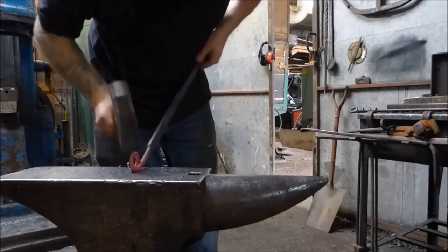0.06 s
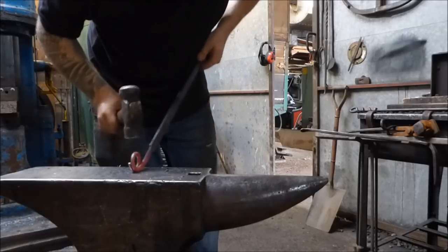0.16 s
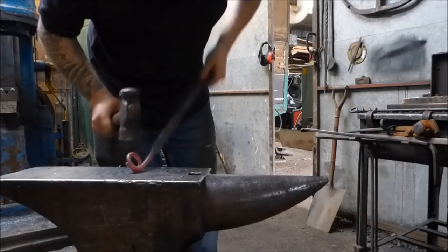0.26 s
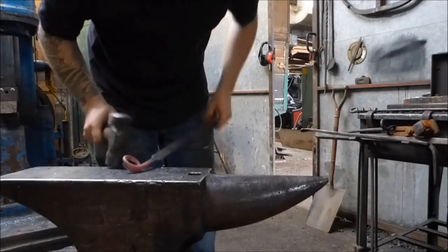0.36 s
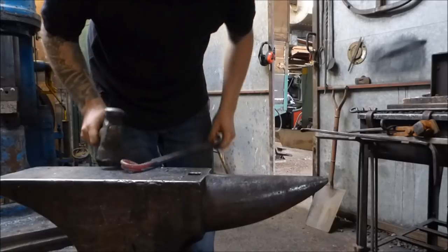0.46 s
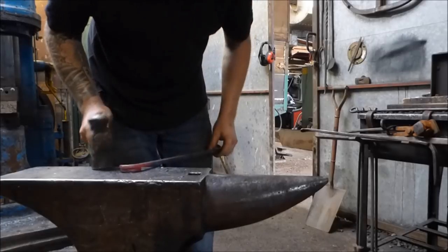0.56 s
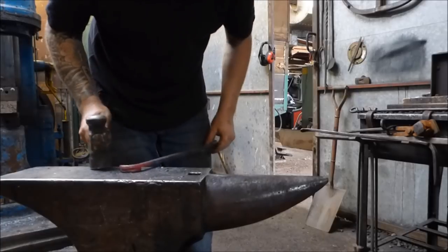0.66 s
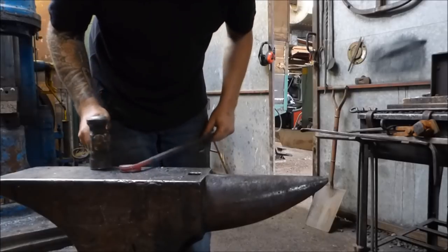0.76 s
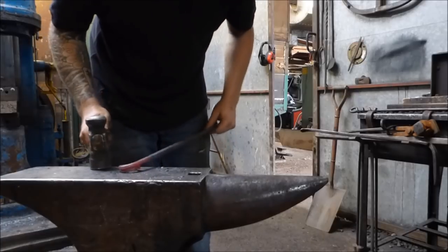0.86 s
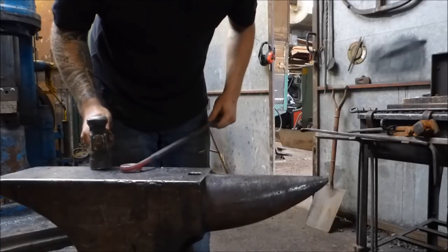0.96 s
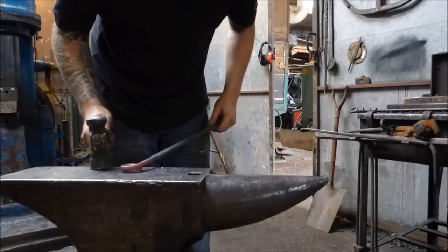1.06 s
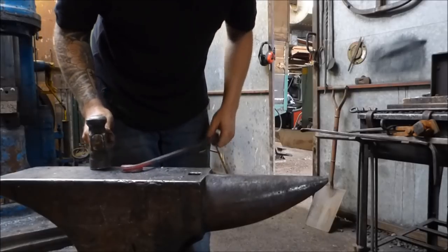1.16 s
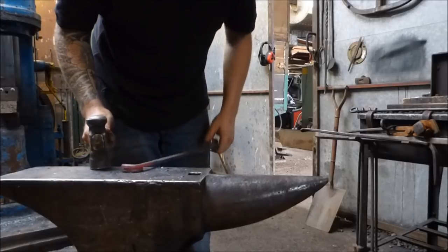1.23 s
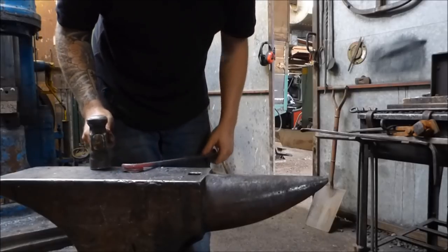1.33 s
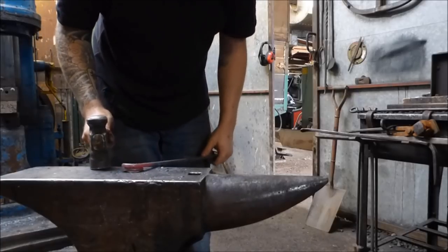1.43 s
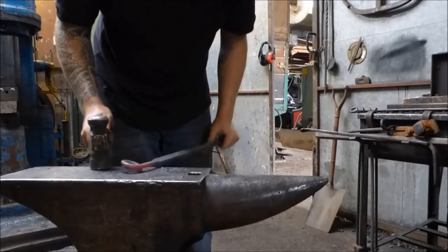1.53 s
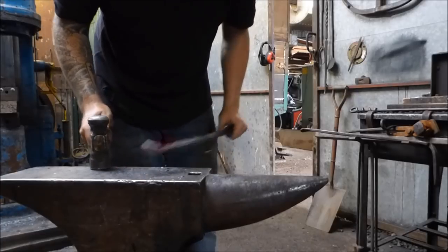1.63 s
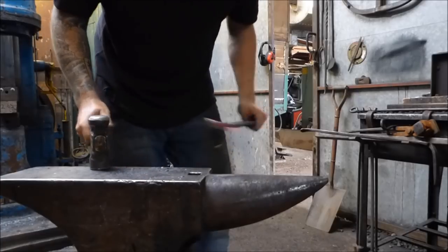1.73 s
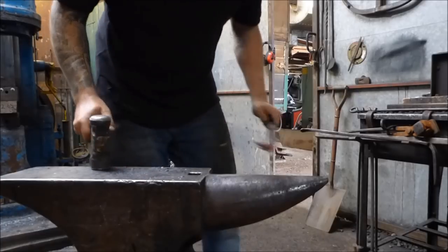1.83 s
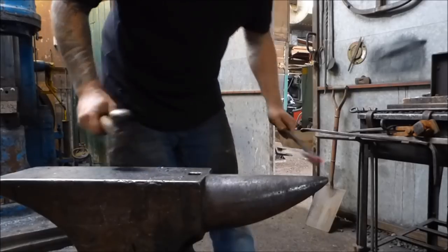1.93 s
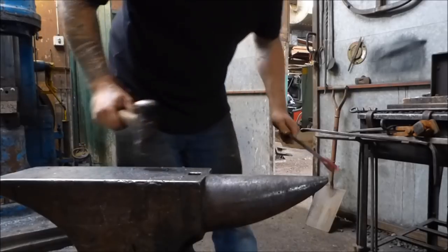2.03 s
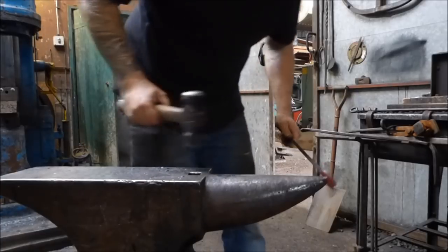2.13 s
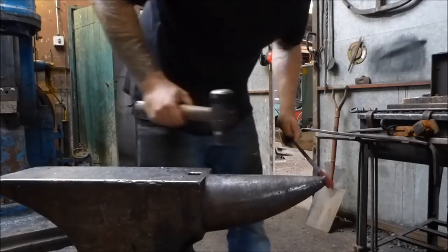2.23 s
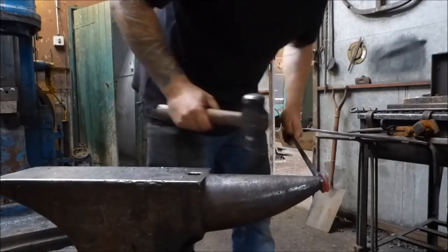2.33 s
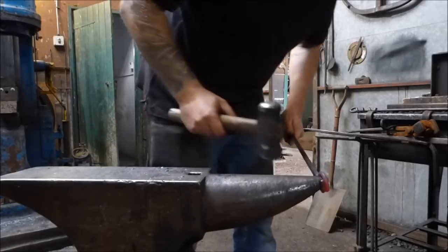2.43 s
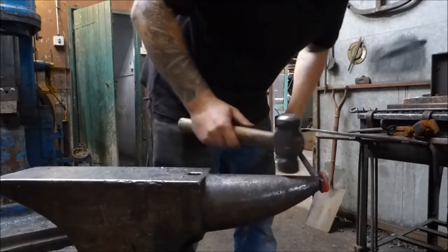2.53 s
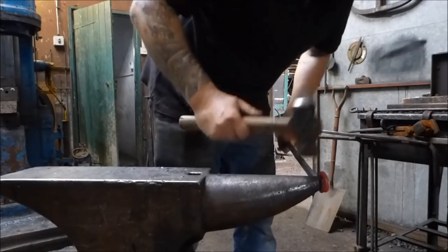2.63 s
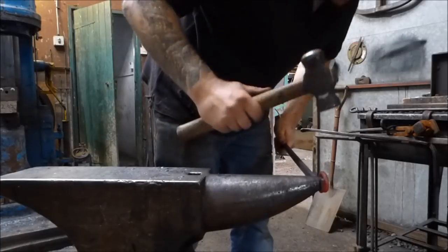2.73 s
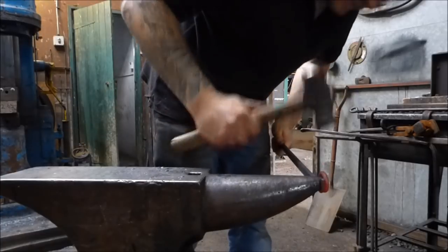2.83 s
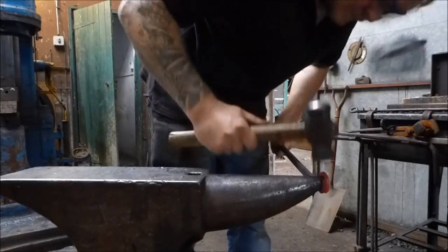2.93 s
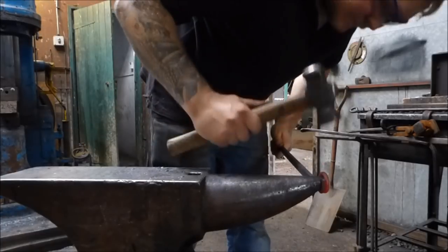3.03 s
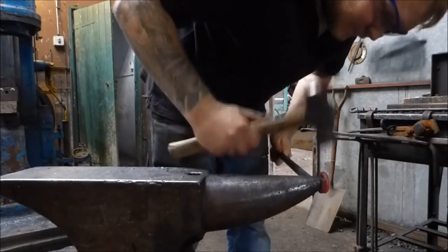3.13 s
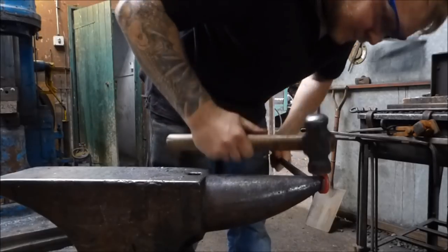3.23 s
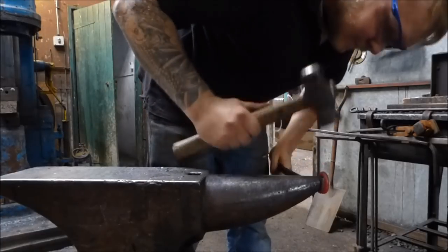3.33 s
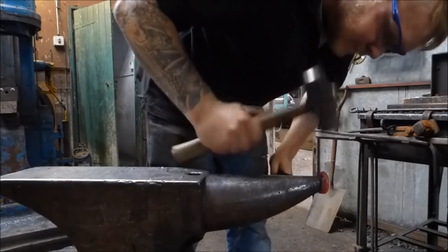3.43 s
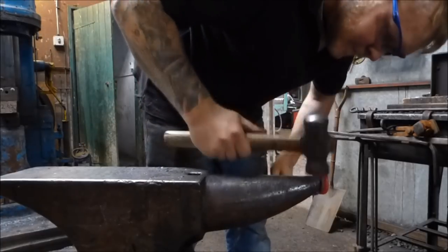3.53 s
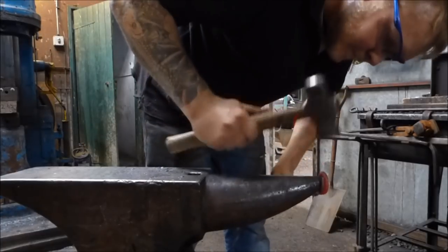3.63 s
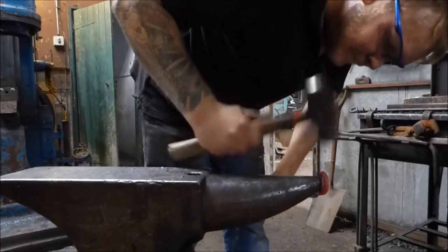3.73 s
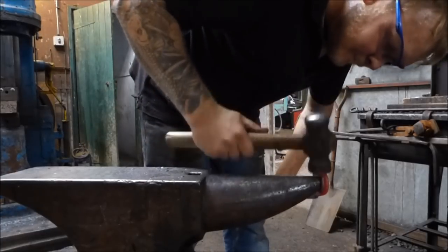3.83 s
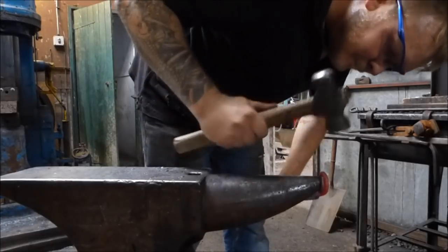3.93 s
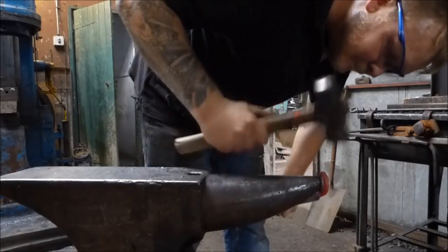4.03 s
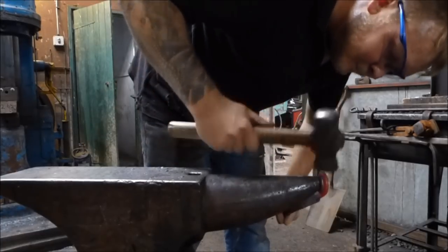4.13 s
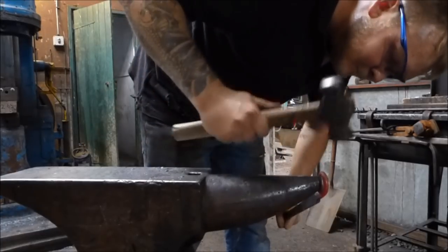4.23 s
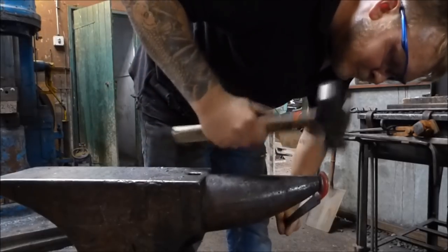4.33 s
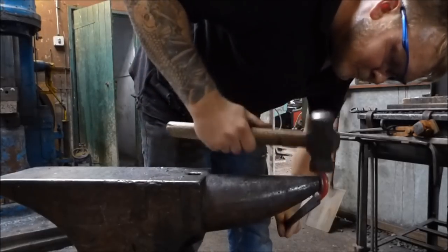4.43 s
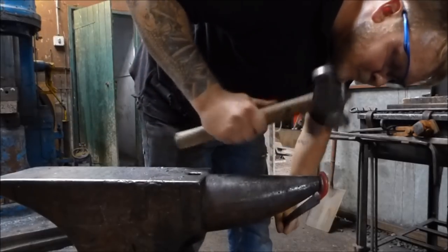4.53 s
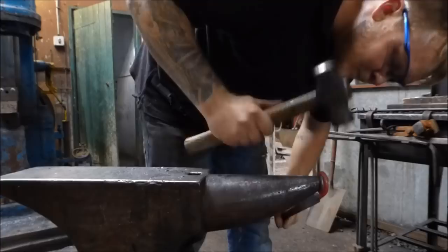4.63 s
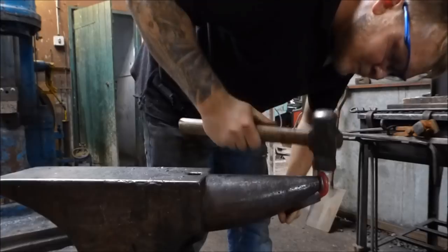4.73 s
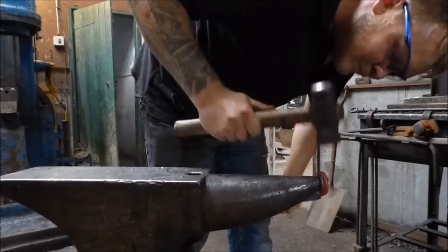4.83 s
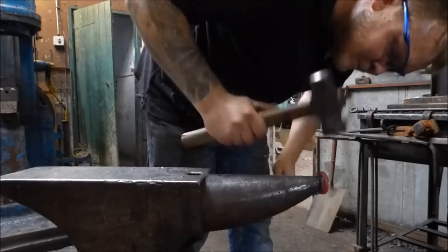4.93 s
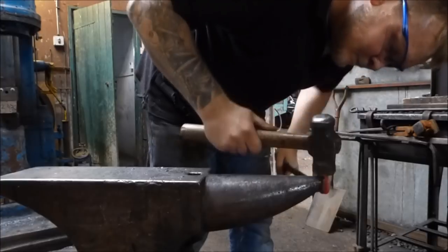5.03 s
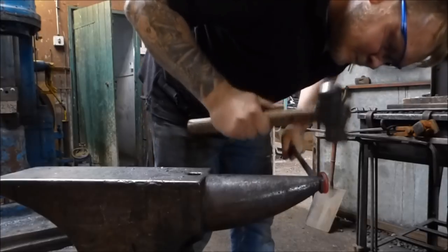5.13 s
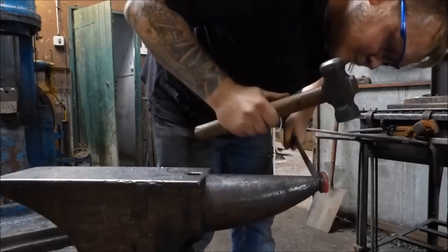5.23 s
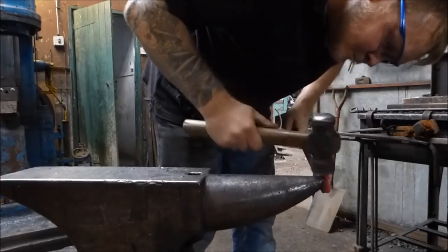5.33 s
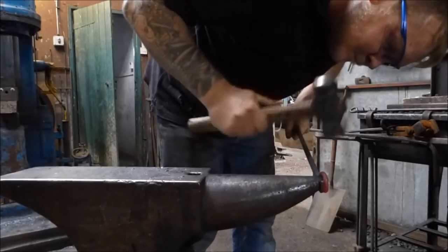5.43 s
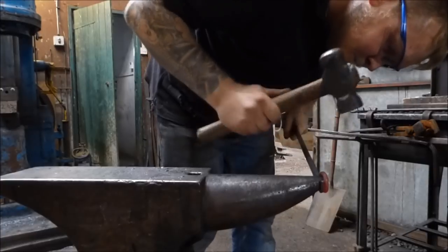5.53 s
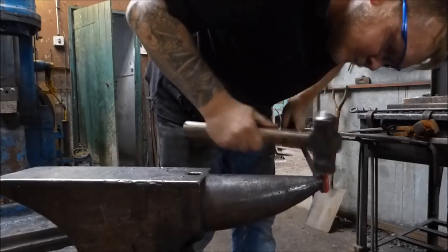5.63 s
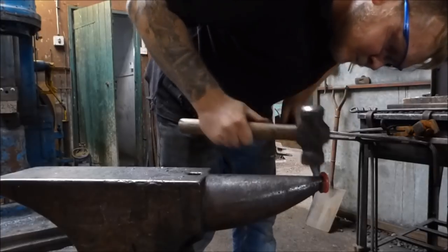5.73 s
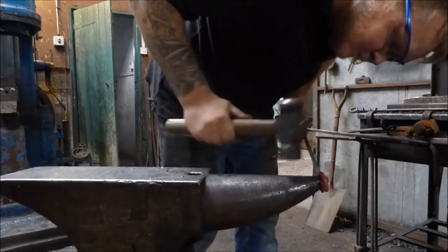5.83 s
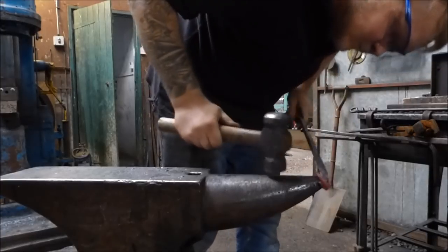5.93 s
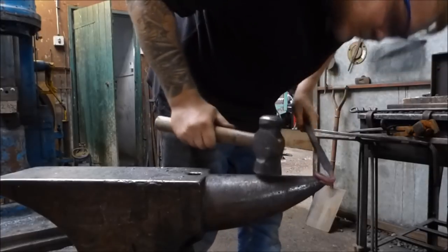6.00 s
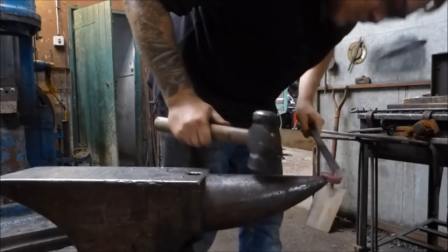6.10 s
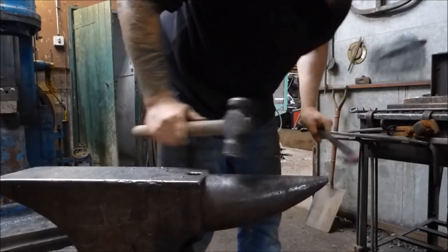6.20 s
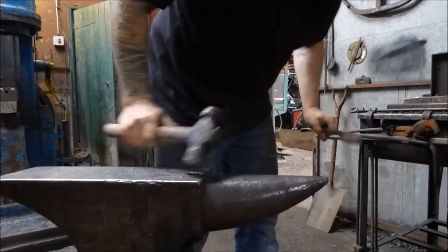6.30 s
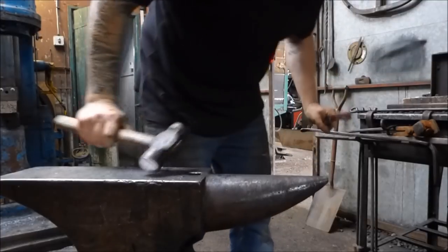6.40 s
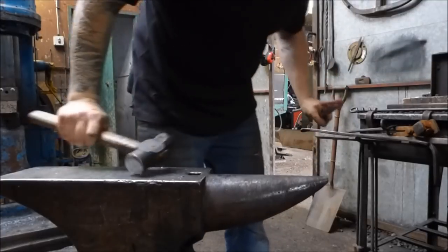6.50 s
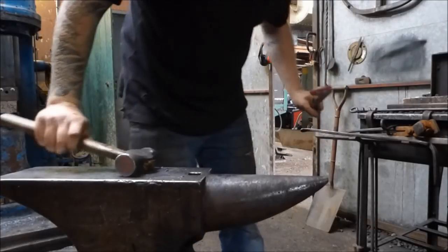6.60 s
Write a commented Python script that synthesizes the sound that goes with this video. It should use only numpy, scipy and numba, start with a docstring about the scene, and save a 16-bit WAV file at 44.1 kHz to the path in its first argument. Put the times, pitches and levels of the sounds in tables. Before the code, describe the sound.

A hammer strikes steel on an anvil, bounces, pauses, then beats out quick, steady ringing blows in a hard-walled forge.

```python
"""Hammer and anvil in a forge

A hand hammer works a hot steel rod between hard walls, close to a microphone with gain control.
It strikes on the anvil's face, drops and bounces there, works the rod over the horn, and bounces
on the face again. In the pause the rod clinks faintly and soft treble swishes pass over a low rustle."""
import sys
import numpy as np
from scipy import signal
from scipy.fft import rfft, irfft, next_fast_len
from scipy.io import wavfile
from scipy.ndimage import uniform_filter1d
from numba import njit

SR = 44100
rng = np.random.default_rng(int(sys.argv[2]) if len(sys.argv) > 2 else 0)


def wav_record(signal):
    """Record a signal, one row per channel, as 16-bit PCM in the file named by sys.argv[1]."""
    frames = np.transpose(np.atleast_2d(signal))
    bounded = np.clip(frames, -1, 1)
    # unit amplitude maps onto the largest positive 16-bit level
    quanta = np.round(bounded * 32767).astype(np.int16)
    wavfile.write(sys.argv[1], SR, quanta)


N = 293706


def amp(db):
    return 10 ** (np.asarray(db) / 20)


def unit(x):
    return x / np.sqrt(np.mean(x ** 2) + 1e-20)


def along(points, hz):
    """Reads (freq_hz, value) points on a log frequency axis."""
    freqs, values = np.transpose(points)
    return np.interp(np.log(hz + 1), np.log(freqs + 1), values)


def filtered(x, gain):
    """x times a gain that depends on frequency."""
    size = next_fast_len(x.shape[-1] + 8192)
    return irfft(rfft(x, size) * gain(np.fft.rfftfreq(size, 1 / SR)), size)[..., :x.shape[-1]]


# The forge's stereo width at the microphone: freq_hz, side_over_mid_db
ROOM_WIDTH = [(60, -3), (110, -18), (200, -27.5), (380, -21.5), (700, -12), (1290, -6.5), (2380, -9),
              (4400, -7.5), (8120, -7), (15000, -1.5)]
def widen(pair, extra_db):
    """Two unrelated signals become mid and side of a left-right pair."""
    side = filtered(pair[1], lambda hz: amp(along(ROOM_WIDTH, hz) + extra_db))
    return np.array([pair[0] + side, pair[0] - side])


# Reverberation between the hard walls: freq_hz, t60_s
WALL_DECAY = [(100, 0.46), (260, 0.74), (700, 0.68), (2000, 0.81), (5000, 0.68), (12000, 0.42)]
def room(x):
    """A fresh diffuse tail builds up quickly, each frequency dying at its own speed."""
    hz, t, noise = signal.stft(rng.standard_normal((2, SR)), SR, nperseg=256)
    decay = amp(-60 * t / along(WALL_DECAY, hz)[:, None])
    tail = signal.istft(noise * decay, SR, nperseg=256)[1][:, :SR]
    tail *= 1 - np.exp(-(np.arange(SR) / SR / 0.00077) ** 2)
    return signal.fftconvolve(x[None], widen(tail / np.linalg.norm(tail[0]), extra_db=-1.5), axes=1)


def place(start_s, near, diffuse):
    """One hit on a stereo track: direct sound just left of centre, plus the walls' answer."""
    hit = room(diffuse)
    hit[:, :len(near)] += near * amp([[.3], [-.3]])
    track = np.zeros((2, N + 3 * SR))
    start = round((start_s + 1) * SR)  # a second of lead-in allows negative start times
    track[:, start:start + hit.shape[1]] += hit
    return track[:, SR:SR + N]


def hiss(spectrum, patchy_db, wide_db):
    """Coloured stereo noise with patches of random gain."""
    noise = signal.stft(rng.standard_normal((2, N)), nperseg=512)[2]
    patches = uniform_filter1d(rng.standard_normal(noise.shape[1:]), size=5, axis=0)
    patches = uniform_filter1d(patches, size=8, axis=1)
    pair = signal.istft(noise * amp(patchy_db * unit(patches)), nperseg=512)[1][:, :N]
    return widen(unit(filtered(pair, lambda hz: amp(along(spectrum, hz)))), wide_db)


# Colour of the rustle all around the microphone: freq_hz, density_db
RUSTLE_SPECTRUM = [(15, -82), (25, -29), (104, -10.5), (218, -6), (259, -3), (332, -3.5), (394, -7),
                   (934, -14), (1110, -16.5), (1420, -18), (9000, -29), (11700, -64), (19800, -120)]
# Its rise and fall: time_s, level_db
RUSTLE_LEVELS = [(1.1, -60.5), (1.5, -58), (1.76, -54), (2.0, -60), (2.07, -55), (2.18, -58), (2.25, -55)]
def rustle():
    """The room's low, wide noise wavers in the pause."""
    level_db = np.interp(np.arange(N) / SR, *np.transpose(RUSTLE_LEVELS))
    return amp(level_db) * hiss(RUSTLE_SPECTRUM, patchy_db=1.5, wide_db=9)


# Colour of the high hiss in the room: freq_hz, density_db
SWISH_SPECTRUM = [(2940, -44), (5000, -10), (5520, 10), (6430, -36), (9430, 12), (12400, 12), (15500, -11)]
# Its swells: start_s, level_db
SWISHES = [(1.369, -57), (1.55, -59), (1.71, -55), (2.04, -55), (2.17, -59)]
def swishes(rise_s=0.031, t60_s=0.31):
    """Treble swishes swell and fade over a faint steady hiss."""
    level = amp(-73.5)
    for start_s, db in SWISHES:
        age = np.maximum(np.arange(N) / SR - start_s, 0)
        level = level + amp(db - 60 * age / t60_s) * (1 - np.exp(-age / rise_s))
    return level * hiss(SWISH_SPECTRUM, patchy_db=1, wide_db=-2)


def ringing(modes, onset_s, scatter_db=2):
    """Damped sines; each blow lands elsewhere and wakes the modes at new strengths."""
    t = np.arange(SR // 2) / SR
    hz, db, t60 = np.transpose(modes)[:, :, None]
    db = db + scatter_db * rng.standard_normal(hz.shape)
    phase = 2 * np.pi * (hz * t + rng.random(hz.shape))
    return (amp(db - 60 * t / t60) * np.sin(phase)).sum(0) * (1 - np.exp(-t / onset_s))


# Modes of the loosely held rod: pitch_hz, level_db, t60_s
LOOSE_ROD_MODES = [(3300, -6, .1), (4880, -3, .12), (5750, -8, .1), (6700, -8, .12), (7650, -8, .1),
                   (8470, -5, .1), (9370, 0, .12), (10250, -3, .1), (11530, 0, .2), (12760, -3, .12)]
# Faint clinks in the pause: start_s, relative_db
ROD_CLINKS = [(0.9994, -50), (1.291, -52.5), (1.5344, -51.5), (1.57, -53)]
def rod_clinks():
    """The rod touches steel and rings thinly."""
    out = np.zeros((2, N))
    for start_s, db in ROD_CLINKS:
        clink = amp(db - 10) * ringing(LOOSE_ROD_MODES, onset_s=0.0025)
        out += place(start_s, clink, amp(1) * clink)
    return out


# Colour of a contact, heard close: freq_hz, density_db
CRACK_SPECTRUM = [(88, -65), (150, 0.5), (695, 4.5), (1450, -4.5), (1940, 1), (2550, -14.5), (4140, -6.5),
                  (7270, -12), (10700, -9), (13000, -15.5), (15500, -46)]
# Its body, middle and treble bands, each: freq_hz, share
CRACK_BANDS = [
    [(1800, 1), (3000, 0)],
    [(1800, 0), (3000, 1), (4800, 1), (6500, 0)],
    [(4800, 0), (6500, 1)],
]
def crack(body_db, treble_db, middle_db=-3, push_over_body_db=8.5, push_s=0.00149):
    """An impact gives a short noise burst in three bands around one low push."""
    t = np.arange(SR // 10) / SR
    noise = filtered(rng.standard_normal(len(t)), lambda hz: amp(along(CRACK_SPECTRUM, hz)))
    burst = sum(amp(db) * unit(filtered(noise, lambda hz: along(band, hz)))
                for band, db in zip(CRACK_BANDS, (body_db, middle_db, treble_db)))
    envelope = (1 - np.exp(-t / 0.0022)) * amp(-60 * t / 0.028)
    impulse = signal.unit_impulse(len(t), round(push_s * SR))
    push = filtered(impulse, lambda hz: amp(along(CRACK_SPECTRUM, hz)) * along(CRACK_BANDS[0], hz))
    return burst * envelope + amp(body_db + push_over_body_db) * push / push.max()


# Ticks just before the work on the horn: start_s, relative_db
DRY_TICKS = [(2.204, -35.5), (2.2228, -34)]
def ticks(t60_s=0.02):
    """Light touches make bright grit with no ring."""
    out, t = np.zeros((2, N)), np.arange(SR // 2) / SR
    for start_s, db in DRY_TICKS:
        noise = rng.standard_normal(len(t))
        grit = unit(filtered(noise, lambda hz: amp(along(CRACK_SPECTRUM, hz)) * hz / (hz + 3000)))
        tick = amp(db - 10.5 - 60 * t / t60_s) * grit
        out += place(start_s, tick, amp(-0.5) * tick)
    return out


# What each kind of contact wakes, relative to its crack:
# horn_db, face_db, rod_db, thump_db, body_db, treble_db, stand_tilt_db_per_octave
TOUCH_MIX = (-20.5, -41, -11.5, -35, -21, -13, 0)  # rod laid against the horn
FACE_MIX = (-71, -18.5, -7.5, -12, -7.5, 4.5, 6.5)  # hammer on the rod on the face
DROP_MIX = (-26.5, 1, -22, -17.5, -8, -15.5, 7.5)  # hammer on the bare face
HORN_MIX = (-0.5, -37, -1.5, -19, -3, -1.5, -8)  # hammer on the rod over the horn
# The rod meets the horn: start_s, relative_db
ROD_TOUCHES = [(2.045, -49.5), (2.268, -30.5)]
# Blows over the face: start_s, relative_db
BLOWS_ON_FACE = [(-.16, -25), (.172, -17.5)]
# Drops onto the face: start_s, relative_db, first_flight_s, loss_db, face_offset_db
HAMMER_DROPS = [(.474, -11.5, .128, 0.7, -13.5), (6.427, -12.5, .102, 2.16, -13.5)]
# Blows over the horn: start_s, relative_db, horn_offset_db, rod_offset_db, body_offset_db
BLOWS_ON_HORN = [(2.411, -22, -20, -13, -19.5), (2.611, -15, -6, -30, -1.5), (2.975, -10, -34, -10.5, -7),
                 (3.277, -10, -20, -13.5, -6.5), (3.569, -10.5, -18, -12, -5), (3.878, -9, -16, -16.5, -6),
                 (4.166, -9.5, -18, -17, -10), (4.476, -11, -27, -13, -11), (4.785, -9.5, -24.5, -11, -12),
                 (5.098, -10.5, -22.5, -10.5, -8), (5.418, -9.5, -24.5, -17.5, -12.5),
                 (5.756, -8.5, -21, -37, -11), (6.011, -11, -4, -17, -6), (6.109, -22, -5, -9, -0.5)]
def contacts(flight_ratio=.65):
    """Every contact as (start_s, relative_db, mix); a dropped hammer bounces ever faster and weaker."""
    rows = [(start_s, db, FACE_MIX) for start_s, db in BLOWS_ON_FACE]
    rows += [(start_s, db, TOUCH_MIX) for start_s, db in ROD_TOUCHES]
    for start_s, db, flight_s, loss_db, face_db in HAMMER_DROPS:
        mix = np.add(DROP_MIX, (0, face_db, 0, 0, 0, 0, 0))
        for bounce in range(6):
            landing_s = start_s + flight_s * (1 - flight_ratio ** bounce) / (1 - flight_ratio)
            rows.append((landing_s, db - loss_db * bounce ** 2, mix))
    for start_s, db, horn_db, rod_db, body_db in BLOWS_ON_HORN:
        rows.append((start_s, db, np.add(HORN_MIX, (horn_db, 0, rod_db, 0, body_db, 0, 0))))
    return [row for row in rows if row[0] < N / SR]


# Modes of the stand under the anvil: pitch_hz, level_db, t60_s
STAND_MODES = [(150, -6, .14), (190, -8, .08), (226, -3, .15), (246, 0, .22), (290, -6, .1), (361, -5, .1),
               (408, -7, .08)]
def stand_thump(tilt_db, pivot_hz=200):
    """The stand speaks through the floor, its modes tilted by tilt_db per octave."""
    modes = [(hz, db + tilt_db * np.log2(hz / pivot_hz), t60) for hz, db, t60 in STAND_MODES]
    return ringing(modes, onset_s=0.0043)


# Modes of the steel near the microphone: pitch_hz, level_db, t60_s
HORN_MODES = [(1878, 0, .09), (1876, -11, .5), (1840, -14, .1), (1905, -14, .12), (1940, -16, .07),
              (1400, -13, .02), (2300, -11, .015), (2794, -11, .02), (3320, -15, .03), (4011, -15, .12),
              (4005, -31, .5), (5728, -18, .08), (7550, -21, .1), (9755, -24, .08), (10060, -25, .08),
              (12390, -33, .5), (13200, -38, .3)]
FACE_MODES = [(900, 8, .006), (2600, 6, .004), (1017, -2, .04), (1211, -2, .07), (2735, -3, .04),
              (2972, -3, .05), (4005, -4, .08), (4409, -2, .04), (4592, -4, .04), (5507, -14, .35),
              (6761, -22, .3), (8113, -11, .05), (11340, -6, .06), (11970, -11, .05)]
ROD_MODES = [(2450, -7, .06), (3386, -6, .07), (4140, -3, .025), (4680, -4, .03), (5114, -3, .025),
             (5750, -4, .025), (6508, -5, .05), (6720, -8, .08), (7510, -3, .035), (8511, -4, .045),
             (9300, -4, .03), (10690, -2, .025), (11050, -11, .2), (11950, -3, .035), (12800, -5, .035)]
def hammer():
    """Each contact cracks, rings anvil and rod, and thumps the stand."""
    out = np.zeros((2, N))
    for start_s, db, mix in contacts():
        horn_db, face_db, rod_db, thump_db, body_db, treble_db, tilt_db = mix
        horn = amp(horn_db) * ringing(HORN_MODES, onset_s=0.00017)
        steel = amp(face_db) * ringing(FACE_MODES, onset_s=0.0001)
        steel += amp(rod_db) * ringing(ROD_MODES, onset_s=0.0023)
        steel[:SR // 10] += crack(body_db, treble_db)
        thump = amp(thump_db) * stand_thump(tilt_db)
        # the horn radiates sideways and reaches the microphone mostly off the walls
        near = steel + amp(2.5) * horn + thump
        diffuse = steel + amp(8) * horn + amp(-0.5) * thump
        out += place(start_s, amp(db + 5) * near, amp(db + 2.5) * diffuse)
    return out


def scene():
    return hammer() + rod_clinks() + ticks() + swishes() + rustle()


@njit
def follow(level, rise_s, fall_s):
    """An envelope that rises and falls at its own two speeds."""
    out = np.empty_like(level)
    held = level[0]
    for i in range(len(level)):
        held += (level[i] - held) / (SR * (rise_s if level[i] > held else fall_s))
        out[i] = held
    return out


def record(dry):
    """Gain control ducks just after a blow and recovers in its tail; then soft clip and band limits."""
    knee_db, ceiling, mic_bass_hz, top_hz = -26.5, .62, 124, 15800
    level = follow(np.abs(dry).max(0), rise_s=0.017, fall_s=0.0065)
    ducked = dry * (1 + (level / amp(knee_db)) ** 2) ** -.35
    clipped = ducked / (1 + (ducked / ceiling) ** 4) ** (1 / 4)
    return filtered(clipped, lambda hz: (hz < top_hz) / (1 + (mic_bass_hz / (hz + 1)) ** 1.77))


dry = scene()
out = record(dry)
wav_record(out)
```